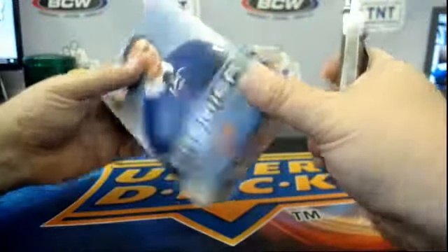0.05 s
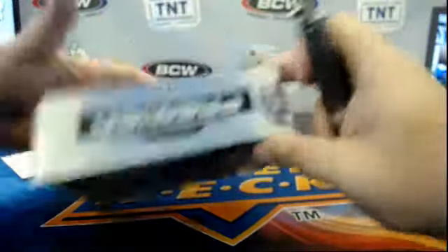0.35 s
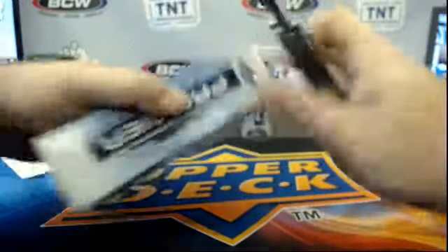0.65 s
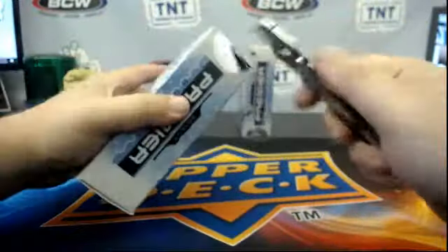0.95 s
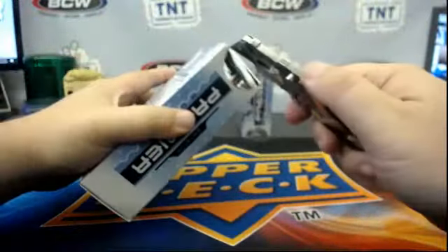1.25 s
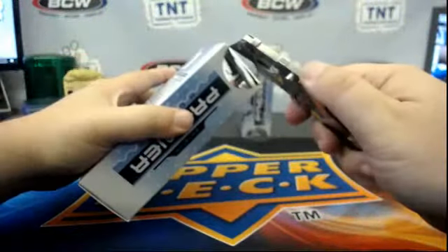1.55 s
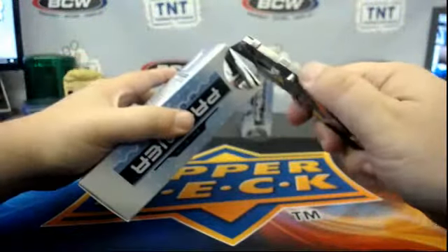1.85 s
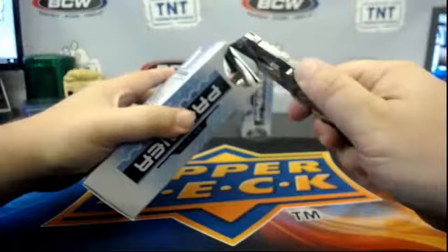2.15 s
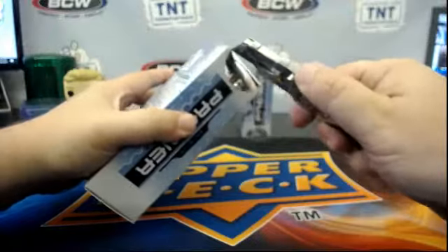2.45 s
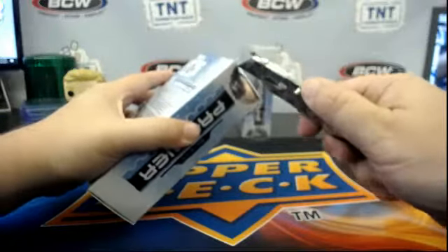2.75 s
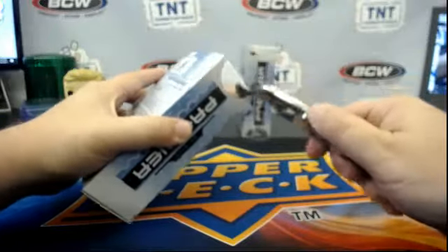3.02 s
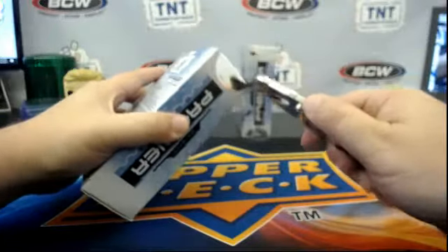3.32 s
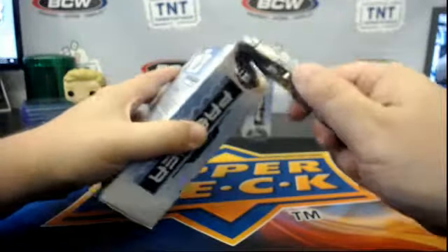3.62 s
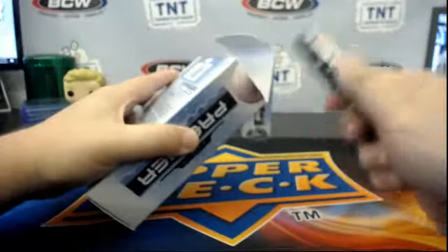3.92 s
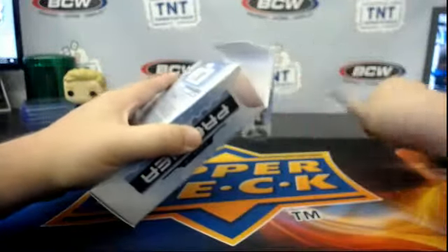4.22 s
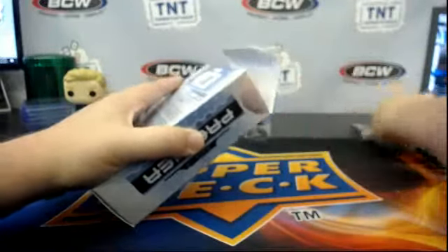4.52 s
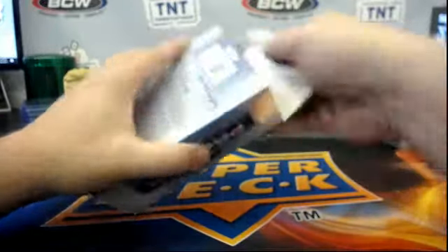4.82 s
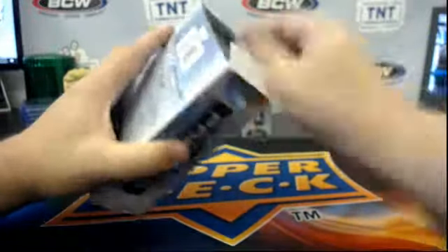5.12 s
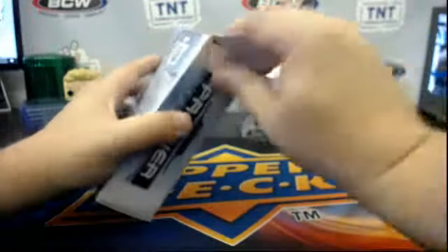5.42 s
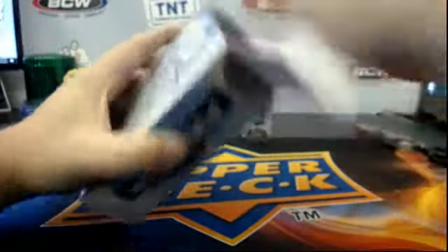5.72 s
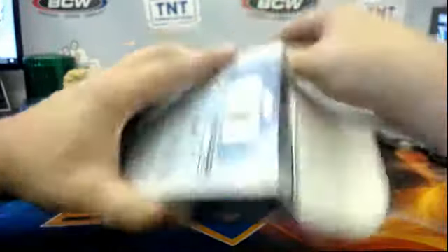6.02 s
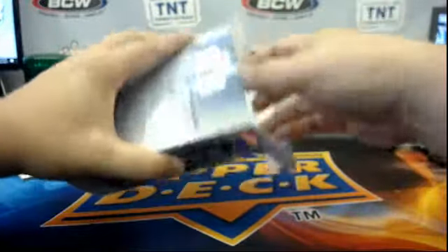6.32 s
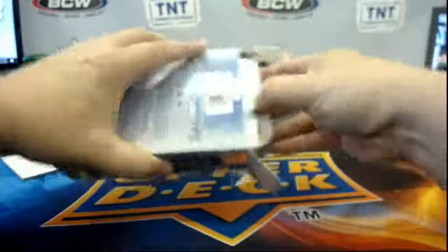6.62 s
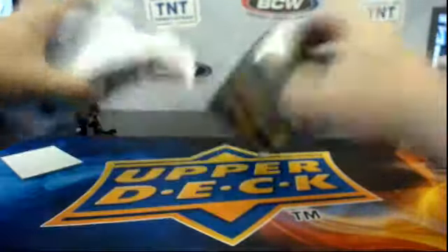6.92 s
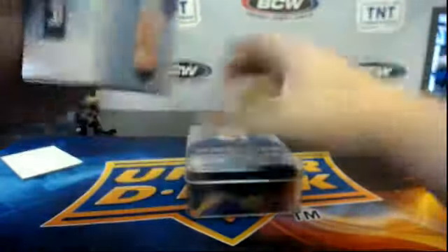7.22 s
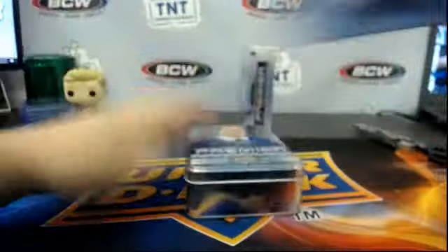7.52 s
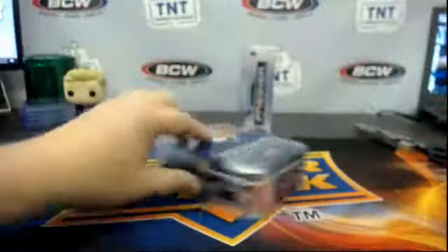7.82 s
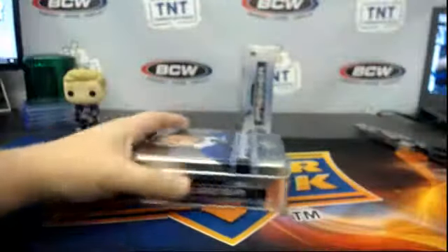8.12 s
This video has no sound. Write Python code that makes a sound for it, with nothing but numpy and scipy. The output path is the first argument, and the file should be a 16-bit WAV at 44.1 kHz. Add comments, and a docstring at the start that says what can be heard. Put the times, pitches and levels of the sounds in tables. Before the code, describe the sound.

Close cardboard cracks and rasps as a box is cut open, then a tin lands with a rattling boom, over low indoor hum.

```python
"""Mains hum and a fan fill a small room. Close to a desk camera, hands turn a card carton over.
A folding knife slits the seal, card cracking and rasping over the hollow box, and is laid down.
Fingers pull the flaps open with snaps and squeaks; a metal tin sticks and slips out with a groan.
The tin drops on the padded table, booming and rattling; the loudest blows overload the microphone.
The carton grazes the lid, which rings faintly, and the tin is pushed round in juddering shoves."""
import sys
import numpy as np
from scipy import signal
from scipy.fft import rfft, irfft
from scipy.io import wavfile
from scipy.ndimage import uniform_filter1d

SR = 44100
rng = np.random.default_rng(int(sys.argv[2]) if len(sys.argv) > 2 else 0)


def to_wav(sig):
    """Store sig (one row per channel, or 1-D mono) as 16-bit WAV at the path in sys.argv[1].

    Samples outside -1..1 are clipped; the rate is SR.
    """
    pcm = np.clip(np.atleast_2d(sig), -1, 1) * 32767
    pcm = np.round(pcm).astype(np.int16)
    wavfile.write(sys.argv[1], SR, pcm.T)  # frames by channels


N = 364266

# fan noise colour: f/Hz, relative level/dB
FAN_SPECTRUM = [(15, -31), (25, -14.5), (50, -10), (64, -16.5), (82, -21), (97, -21), (120, -5), (149, -19),
                (270, -21.5), (416, -23), (463, -21), (516, -30.5), (1130, -36.5), (1230, -33),
                (1790, -42.5), (16000, -69.5)]
# stereo image of the fan: f/Hz, left-right correlation
FAN_CORRELATION = [(60, 0.9), (180, 1), (550, 0.85), (1650, 0.042), (4970, 0), (15000, 0.27)]
# mains hum partials: f/Hz, level/dB
HUM_PARTIALS = [(58.5, -58), (116.5, -47), (269, -64.5), (320, -62.5)]
# decay of the room tail: f/Hz, t60/s
ROOM_DECAY = [(150, 0.44), (500, 0.58), (2000, 0.42), (6000, 0.22), (14000, 0.35)]
# dull blows through the table top: t/s, level/dB, cushioning cut-off/Hz
TABLE_THUMPS = [(2.815, -18.5, 199), (3.653, -22, 90), (4.3264, -4, 480), (6.876, -22.5, 170),
                (6.913, -21, 187), (7.071, -4, 290), (7.199, -7.5, 242), (7.211, -35, 293),
                (7.991, -10, 240), (8.002, -7, 246), (8.056, -14.5, 260)]
# ring of the padded table: f/Hz, level/dB, t60/s
TABLE_MODES = [(80, -12.5, 0.056), (116.6, -3, 0.12), (175, -1.5, 0.13), (197, -3, 0.14), (272, -2, 0.12),
               (328, 2, 0.14), (397.8, -8, 0.24), (465, -1, 0.096), (613, -14, 0.087), (925, -23, 0.027)]
# body of the card panels: f/Hz, width/Hz, level/dB
CARD_RESONANCES = [(600, 55, 8.5), (1220, 510, 6.5), (1480, 710, 1.5), (2430, 480, -0.5), (3140, 700, -4),
                   (5190, 760, -11.5), (6850, 700, -35), (9800, 430, -45)]
# coated card slipping: centre t/s, half length/s, f/Hz, glide/(Hz/s), level/dB, jitter/share of pitch
CARD_SQUEAKS = [(0.272, .015, 3990, 25, -47.5, .12), (0.62, .06, 3300, 0, -69.5, 0.13),
                (3.235, 0.015, 1465, 7, -40.5, 0.15), (5.787, 0.044, 4700, 3005, -52.5, 0.089),
                (6.01, 0.0059, 4830, -11.5, -39, 0.051), (6.014, 0.007, 1558, -3000, -32, 0.037),
                (6.12, 0.011, 1192, 0, -37, 0.038), (6.55, .0062, 1508, 1.5, -31.5, 0.1),
                (6.597, 0.014, 2970, 9008, -36, 0.12), (6.6, 0.016, 3400, 15998, -35, 0.14)]
# stick and slip swinging a panel: peak t/s, half length/s, f/Hz, level/dB
PANEL_GROANS = [(0.019, 0.017, 309, -37.5), (0.441, 0.0034, 356, -21.5), (2.838, 0.023, 422.7, -18.5),
                (3.624, 0.0071, 316, -15), (4.737, 0.003, 330, -18.5), (4.995, 0.0057, 303, -22.5),
                (6.443, 0.0045, 325, -34.5), (6.501, 0.019, 295, -29), (6.558, 0.0072, 295, -17),
                (6.623, 0.01, 315, -4.5), (6.65, 0.0034, 303, -13.5), (6.67, 0.0062, 460, -18)]
# card sliding and tearing, the knife scraping the mat as it is laid down, the tin sliding,
# and a faint hiss as it rings after the tap: peak t/s, rise/s, fall/s, level/dB, brightness/(dB/octave)
RUBS = [ (0.018, .011, 0.077, -48.5, 4.5), (0.13, 0.072, 0.23, -64.5, 4.5),
        (0.275, 0.036, 0.068, -49, -2.5), (0.39, 0.1, 0.21, -55, 1), (0.64, 0.17, 0.44, -62.5, -2),
        (2.784, 0.053, 0.15, -38.5, -1.5), (3.256, .065, 0.11, -45, -1.5), (3.388, 0.038, 0.12, -50, -1.5),
        (3.609, 0.03, 0.085, -29, -5), (3.681, .038, 0.055, -33, -3), (3.742, 0.033, 0.17, -59, 2.5),
        (3.991, 0.067, .053, -54, 0), (4.338, .012, 0.1, -56, 7), (4.661, 0.066, 0.062, -44.5, -3),
        (4.849, 0.15, 0.14, -50.5, 1), (4.955, 0.032, 0.18, -45.5, 1.5), (5.225, 0.03, 0.18, -47.5, 1),
        (5.45, 0.24, 1, -64.5, 5), (5.77, 0.073, .15, -48.5, 5.5), (5.83, .06, 0.57, -54, -1.5),
        (6.061, 0.1, 0.097, -50.5, -1.5), (6.5, 0.12, 0.23, -41, 4), (6.594, 0.074, 0.12, -39, 0),
        (7.022, 0.12, .13, -60, -1), (7.224, 0.098, 0.11, -50.5, 0), (7.651, 0.088, .36, -59, 1),
        (7.886, 0.038, 0.15, -38.5, 0), (7.999, .08, 0.31, -49, -2), (8.178, 0.038, .12, -38.5, -6)]
# snaps of card, and taps against the tin:
# t/s, crack level/dB, brightness/(dB/octave), flap f/Hz, hollow level/dB, hollow f/Hz
SNAPS_AND_TAPS = [ (0.281, -51, 1, 3190, -35.5, 210), (0.458, -45, -5.5, 1080, -56, 303),
                  (0.642, -58, -0.5, 910, -41.5, 415), (1.77, -43.5, -6, 1520, -49, 320),
                  (1.822, -39, -6, 1580, -51.5, 313), (2.2181, -52, -8, 1630, -49, 314),
                  (2.521, -26, -3.5, 1550, -23.5, 441), (2.774, -29.5, -4, 1290, -36, 430),
                  (2.8121, -16, -2, 1110, -13.5, 405), (2.822, -23.5, -6.5, 940, -24, 407),
                  (2.8731, -30, -5.5, 855, -28, 410), (3.12, -41, 1, 6150, -60, 470),
                  (3.133, -27.5, -2.5, 1310, -25.5, 475), (3.402, -40.5, -2.5, 1250, -29.5, 334),
                  (3.5939, -17, 1, 9400, -23, 320), (3.6529, -13, -2, 2380, -16.5, 329),
                  (3.667, -43, -7, 2200, -26.5, 266), (3.6904, -23.5, -2.5, 2480, -43, 360),
                  (3.9951, -48.5, 0.5, 1320, -43.5, 426), (4.0207, -46, -3, 1580, -36.5, 422),
                  (4.084, -56, 2, 980, -30.5, 405), (4.167, -55, 0, 1330, -35.5, 287),
                  (4.327, -44.5, -2.5, 740, -16, 298), (4.621, -30, -2.5, 1160, -35.5, 327),
                  (4.6753, -38.5, -5.5, 1300, -44, 288), (4.7113, -22.5, 0.5, 1090, -19, 325),
                  (4.782, -24, -3, 1780, -32.5, 272), (4.824, -32.5, -5.5, 2470, -41.5, 413),
                  (4.852, -41.5, 3.5, 2360, -62, 250), (4.9232, -30.5, 7.5, 4800, -40, 328),
                  (4.983, -21, 1.5, 1600, -24.5, 397), (5.0168, -24, -2.5, 1490, -24.5, 225),
                  (5.1246, -48, 3, 4270, -54, 490), (5.142, -44.5, 3.5, 1200, -43, 520),
                  (5.168, -34.5, 6.5, 6600, -34, 495), (5.2367, -40.5, 11, 5600, -52, 560),
                  (5.413, -48, 1, 2400, -59.5, 353), (5.5034, -53, 5.5, 1160, -62, 278),
                  (5.6123, -26, -8, 710, -22, 410), (5.6541, -40.5, -4, 1360, -35.5, 245),
                  (5.7332, -33, -0.5, 1510, -32, 468), (5.8242, -42, 4.5, 3500, -41, 280),
                  (6.0042, -49.5, 2.5, 1550, -53, 300), (6.014, -44, 0, 1530, -33.5, 270),
                  (6.034, -46, -9, 1370, -30, 291), (6.046, -39.5, -0.5, 1550, -39.5, 600),
                  (6.1096, -40.5, -3, 1172, -29.5, 417), (6.147, -36.5, -4, 1250, -24.5, 414),
                  (6.2824, -40, -3.5, 1180, -32.5, 316), (6.3497, -38, -1.5, 1380, -32.5, 333),
                  (6.5077, -34.5, 0, 1790, -20.5, 302), (6.5457, -37, -12, 1470, -30, 287),
                  (6.607, -29, -2, 1320, -14.5, 320), (6.904, -56, 0.5, 976, -46.5, 317),
                  (7.198, -40.5, -0.5, 1200, -18.5, 224), (7.2077, -42.5, -1.5, 2480, -28, 248),
                  (7.412, -56, 0.5, 1410, -41.5, 302), (7.5712, -28, -3, 2440, -22, 357),
                  (8.174, -34, -6, 1420, -30.5, 262)]
# ring of the free lid: f/Hz, level/dB, t60/s
LID_MODES = [(1880, -10, 1.4), (2310, -3.5, 2.7), (2837, -6, 0.97), (3305, -4, 1.1), (4600, -3, 0.38),
             (5367, -12, 1.1)]
# the hand shoving the tin over the mat: t/s, level/dB, t60/s
TIN_SHOVES = [(7.857, -15, .48), (7.885, -6, 0.084), (7.995, -35, 0.63), (8.16, -30.5, .2)]
# tin walls damped by the hand: f/Hz, width/Hz, level/dB
HELD_TIN_RESONANCES = [(285, 54, -17), (348, 41, -11), (500, 170, 15), (607, 100, 2), (793, 46, 15),
                       (878, 23, 20.5), (1080, 43, -31), (1430, 90, -27), (1640, 60, -28), (1920, 90, -24)]
# the tin landing and its contents settling: t/s, level/dB, cushioning cut-off/Hz, rattle level/dB
TIN_IMPACTS = [(7.073, 5, 820, -17.5), (7.084, 3.5, 830, -33), (7.098, 3, 1220, -51),
               (7.115, -2.5, 1490, -58), (7.157, -12.5, 797, -60), (7.862, -17, 1220, -32.5),
               (7.873, -17, 1210, -24.5), (7.895, -6.5, 1750, -35), (8.163, -23, 1500, -39)]
# ring of the struck tin: f/Hz, level/dB, t60/s
TIN_MODES = [(189.4, -11, 0.2), (262, -2, 0.16), (326.7, -1.5, 0.46), (394, -1.5, 0.19), (458.3, 1, 0.1),
             (545, -6.5, 0.11), (605.5, -0.5, 0.19), (687, -8.5, 0.046), (770, -21, 0.02),
             (954, -7.5, 0.04), (1045, -12.5, 0.07), (1164, -3, 0.062), (1410, -7, 0.11),
             (1600, -5.5, 0.096), (1930, -2.5, 0.02), (1980, -19, 0.054), (2270, -25, 0.087)]


def amp(db):
    """Decibels to gain."""
    return 10 ** (np.asarray(db) / 20)


def unit_rms(x):
    """Scales to rms 1."""
    return x / np.sqrt(np.mean(x ** 2) + 1e-20)


def levelled(x, db, length_s):
    """Scales a sound so that its energy, spread over length_s, has the given level."""
    return amp(db) * x / np.sqrt(np.sum(np.atleast_2d(x).mean(0) ** 2) / (length_s * SR) + 1e-20)


def curve_at(points, hz):
    """Reads a curve on a log-frequency axis."""
    f, value = np.transpose(points)
    return np.interp(np.log(hz + 1), np.log(f + 1), value)


def add(mix, s, sound):
    """Lays a sound into both channels at time s."""
    part = mix[:, max(round(s * SR), 0):][:, :sound.shape[-1]]
    part += sound[..., :part.shape[1]]


def seconds(length):
    """A time axis."""
    return np.arange(int(length * SR)) / SR


def fade(t, t60):
    """Exponential decay, 60 dB down at t60."""
    return np.exp(-np.log(1000) * t / t60)


def lowpass(x, hz, order=2):
    """Butterworth low-pass."""
    return signal.sosfilt(signal.butter(order, hz, fs=SR, output="sos"), x)


def highpass(x, hz):
    """Butterworth high-pass."""
    return signal.sosfilt(signal.butter(2, hz, "high", fs=SR, output="sos"), x)


def band(x, low_hz, top_hz, order=4):
    """Trims both ends; order sets the steepness of the high cut."""
    return highpass(lowpass(x, top_hz, order), low_hz)


def tilted(x, slope_db, from_hz=800, to_hz=8000):
    """A harder contact is brighter: tilts the treble by slope_db per octave."""
    size = x.shape[-1]
    octaves = np.log2(np.clip(np.fft.rfftfreq(2 * size, 1 / SR), from_hz, to_hz) / from_hz)
    return irfft(rfft(x, 2 * size) * amp(slope_db * octaves))[..., :size]


def resonate(x, modes):
    """Parallel resonances: f/Hz, width/Hz, level/dB."""
    return sum(amp(db) * signal.lfilter(*signal.iirpeak(hz, hz / width, SR), x)
               for hz, width, db in modes)


def stereo_noise(size, spread):
    """White noise at two microphone ports; spread widens the image."""
    mid, side = rng.standard_normal((2, size))
    return np.array([mid + spread * side, mid - spread * side])


def wobble(size, hz):
    """Random modulation of rms 1, rolled off above hz."""
    return unit_rms(lowpass(rng.standard_normal(size), hz))


def strike(modes, db, soft_hz, low_hz):
    """A cushioned blow rings the modes; neighbouring modes start in opposite directions."""
    t = seconds(1)
    ring = sum((-1) ** k * amp(mode_db) * np.sin(2 * np.pi * hz * t) * fade(t, t60)
               for k, (hz, mode_db, t60) in enumerate(modes))
    ring = band(ring, low_hz, soft_hz, order=2)
    return amp(db) * ring / abs(ring).max()


def fan(level_db=-48):
    """A steady bed of fan noise, centred in the bass and wide in the treble."""
    hz = np.fft.rfftfreq(N, 1 / SR)
    left, unrelated = rfft(rng.standard_normal((2, N)))
    correlation = curve_at(FAN_CORRELATION, hz)
    right = correlation * left + np.sqrt(1 - correlation ** 2) * unrelated
    spectrum = np.array([left, right]) * amp(curve_at(FAN_SPECTRUM, hz))
    return amp(level_db) * unit_rms(irfft(spectrum, N))


def mains_hum(waver_hz=1.6):
    """Low partials, each wavering slightly in pitch."""
    out = np.zeros(N)
    for hz, db in HUM_PARTIALS:
        pitch = hz + waver_hz * wobble(N, 6)
        out += amp(db) * np.sqrt(2) * np.sin(2 * np.pi * np.cumsum(pitch) / SR)
    return out


def room(x, early_db=-15, tail_db=-20, wide_hz=900, scatter_db=-8, scatter_hz=2600):
    """Near reflections off desk and screens, then a faint tail whose bass is alike at both ports."""
    t = seconds(0.6)
    mid, side = rng.standard_normal((2, len(t)))
    side = highpass(side, wide_hz)
    wash = np.array([mid + side, mid - side]) * np.minimum(t / 0.015, 1)
    hz, frame_s, spectra = signal.stft(wash, SR, nperseg=256)
    spectra *= fade(frame_s, curve_at(ROOM_DECAY, hz)[:, None])
    tail = signal.istft(spectra, SR, nperseg=256)[1][:, :len(t)]
    early = np.zeros(len(t))
    early[(SR * rng.uniform(0.003, 0.022, size=8)).astype(int)] = rng.choice([-1, 1], 8) / np.sqrt(8)
    echo = lowpass(amp(early_db) * early + amp(tail_db) * tail / np.linalg.norm(tail[0]), 4800, order=1)
    # the camera housing and the hands scatter the treble differently into each port
    scatter = highpass(rng.standard_normal(len(t)) * fade(t, 0.017) * np.minimum(t / 0.001, 1), scatter_hz)
    echo += amp(scatter_db) * np.array([[1], [-1]]) * scatter / np.linalg.norm(scatter)
    return signal.fftconvolve(x, echo, axes=1)[:, :N]


def table_thumps():
    """The knife, the carton and the tin bump the padded table and ring its low modes."""
    out = np.zeros((2, N))
    for s, db, soft_hz in TABLE_THUMPS:
        add(out, s, strike(TABLE_MODES, db, soft_hz, low_hz=66.6))
    return out


def card_squeaks(jitter_hz=900):
    """Fast, uneven slips of coated card give a rough, gliding whistle."""
    out = np.zeros((2, N))
    for s, half, hz, glide, db, jitter in CARD_SQUEAKS:
        t = seconds(4 * half) - 2 * half
        pitch = (hz + glide * t) * (1 + jitter * wobble(len(t), jitter_hz))
        whistle = np.sqrt(2) * np.sin(2 * np.pi * np.cumsum(pitch) / SR)
        add(out, s - 2 * half, amp(db) * np.exp(-(t / half) ** 2) * whistle)
    return out


def panel_groans(second_db=-24, third_db=-29, sag=0.051):
    """Stick and slip swings a panel: an almost pure tone swells and dies as its pitch sags."""
    out = np.zeros((2, N))
    for s, half, hz, db in PANEL_GROANS:
        t = seconds(4 * half) - half
        crest_s = half * np.where(t < 0, 0.65, 0.39)
        swing = np.exp(-(t / crest_s) ** 2) + 0.69 * np.exp(-(t / half) ** 2)
        phase = 2 * np.pi * hz * (t - sag * t ** 2 / (2 * half))
        tone = np.sin(phase) + amp(second_db) * np.sin(2 * phase) + amp(third_db) * np.sin(3 * phase)
        add(out, s - half, amp(db) * swing * tone)
    return out


def rubs(grains_per_s=600, grain_db=4.5, hiss=0.96, grip_db=2, grip_hz=50):
    """Surfaces catch and let go: swells of hiss and fine grains, coloured like card and a hollow box."""
    out = np.zeros((2, N))
    for peak_s, rise, fall, db, bright_db in RUBS:
        length = rise + fall
        t = seconds(length)
        catches = rng.random(len(t)) < grains_per_s / SR
        strength = amp(grain_db * np.minimum(rng.exponential(1, len(t)), 4))
        bursts = signal.lfilter([1], [1, -0.85], catches * strength)  # a tiny tail on each catch
        grains = stereo_noise(len(t), 0.5) * (hiss + bursts)
        grains *= amp(grip_db * wobble(len(t), grip_hz))  # the grip tightens and eases
        scrape = tilted(band(resonate(grains, CARD_RESONANCES), 600, 11000), bright_db)
        hollow = lowpass(resonate(grains.mean(0), [(331.7, 110, 0.42), (450, 40, 0.076)]), 650)
        stroke = np.interp(t, [0, rise, length], [0, 1, 0]) ** 1.49
        rasp = levelled(scrape, db - 1, length) + levelled(hollow, db + 2, length)
        add(out, peak_s - rise, stroke * rasp)
    return out


def snaps_and_taps(attack_s=0.0017, crack_s=0.019, flutter_s=0.11, hollow_s=0.085, punch_s=0.0087,
                   crunch_db=4, flutter_db=-16, tone_db=-17, trim_db=1, energy_s=0.0098):
    """Card snaps or the tin is tapped: a cluster of tiny cracks, fluttering panels, a hollow ring."""
    out, t = np.zeros((2, N)), seconds(0.07)
    for s, crack_db, bright_db, flap_hz, hollow_db, hollow_hz in SNAPS_AND_TAPS:
        crunch = unit_rms(amp(crunch_db * wobble(len(t), 360)))
        crack = stereo_noise(len(t), 0.25) * fade(t, crack_s) * np.minimum(t / attack_s, 1) * crunch
        crack[:, int(attack_s * SR)] += 0.5  # a click tops the attack
        flutter = lowpass(stereo_noise(len(t), 0.25), 2400, order=1)
        flutter *= amp(flutter_db) * fade(t, flutter_s) * crunch
        panels = tilted(band(resonate(crack + flutter, CARD_RESONANCES), 560, 10800), bright_db)
        bite = panels + resonate(panels, [(flap_hz, 0.15 * flap_hz, 4)])
        tone = amp(tone_db) * np.sin(2 * np.pi * hollow_hz * t)
        tone *= fade(t, hollow_s) + 2 * fade(t, punch_s)
        air = resonate(flutter.mean(0) + 0.16 * crack.mean(0), [(302, 180, 11), (534, 38, 0.55)])
        hollow = band(tone + air, 190, 760)
        snap = levelled(bite, crack_db, energy_s) + levelled(hollow, hollow_db, energy_s)
        add(out, s - attack_s, amp(trim_db) * snap)
    return out


def lid_ring(graze_s=7.571, level_db=-66):
    """The passing carton grazes the tin; free of the hand, the lid sings faintly in its high modes."""
    out, t = np.zeros((2, N)), seconds(1)
    for hz, db, t60 in LID_MODES:
        add(out, graze_s, amp(level_db + db) * np.sin(2 * np.pi * hz * t) * fade(t, t60))
    return out


def tin_drag(attack_s=0.0084):
    """At each shove the rim judders over the mat and drives the hand-damped walls, fading as it slows."""
    out, t = np.zeros((2, N)), seconds(0.36)
    for s, db, t60 in TIN_SHOVES:
        walls = band(resonate(stereo_noise(len(t), 0.42), HELD_TIN_RESONANCES), 193, 1450, order=3)
        walls /= np.sqrt(uniform_filter1d((walls ** 2).mean(0), size=900) + 1e-12)  # ride the level flat
        shove = np.minimum(t / attack_s, 1) ** 2 * fade(np.maximum(t - attack_s, 0), t60)
        add(out, s, amp(db) * shove * walls)
    return out


def tin_impacts(rattle_s=0.081, shimmer_db=-31, shimmer_s=0.75, clunk_db=-17, clunk_s=0.093):
    """Walls boom, contents clunk, the lid rattles and the sheet metal's dense high modes shimmer on."""
    out, t = np.zeros((2, N)), seconds(1)
    for s, db, soft_hz, rattle_db in TIN_IMPACTS:
        lid = resonate(stereo_noise(len(t), 0.72), [(2600, 1500, 0), (1100, 900, 2)])
        rattle = unit_rms(lowpass(lid, 4600)) * fade(t, rattle_s)
        sheet = resonate(stereo_noise(len(t), 1), [(2300, 1200, 0)])
        shimmer = amp(shimmer_db) * unit_rms(sheet) * fade(t, shimmer_s)
        contents = resonate(stereo_noise(len(t), 0.43), [(650, 220, 0), (400, 140, 0)])
        clunk = amp(db + clunk_db) * unit_rms(lowpass(contents, 860, order=4)) * fade(t, clunk_s)
        boom = strike(TIN_MODES, db, soft_hz, low_hz=154)
        add(out, s, boom + clunk + amp(rattle_db) * (rattle + shimmer))
    return out


def scene():
    """Close-up carton and tin over a bed of fan and hum, all panned a touch to the left."""
    handling = (snaps_and_taps() + rubs() + card_squeaks() + panel_groans()) * amp([[0.6], [-0.6]])
    desk = (table_thumps() + tin_impacts() + tin_drag() + lid_ring()) * amp([[0.4], [-0.4]])
    reflections = room(handling + desk)
    bed = (fan() + mains_hum()) * amp([[0.7], [-0.7]])
    return handling + desk + reflections + bed


def record(dry, top_hz=16000):
    """The microphone soft-clips the peaks at full scale; a steep high cut follows."""
    clipped = dry / (1 + dry ** 8) ** (1 / 8)
    high_cut = signal.firwin(511, top_hz, window=("kaiser", 9), fs=SR)
    return signal.oaconvolve(clipped, high_cut[None], "same")


dry = scene()
out = record(dry)
to_wav(out)
```